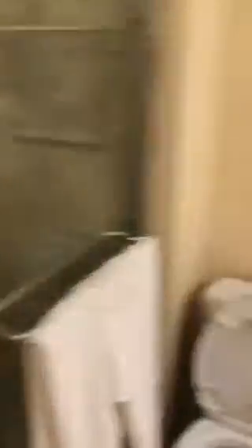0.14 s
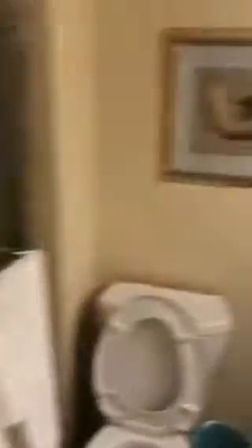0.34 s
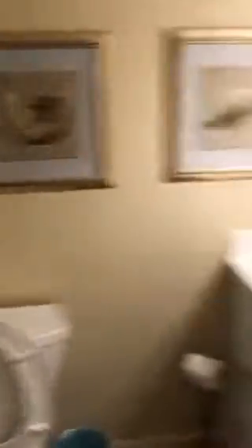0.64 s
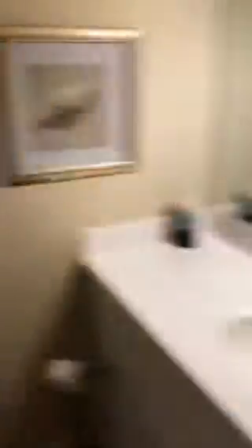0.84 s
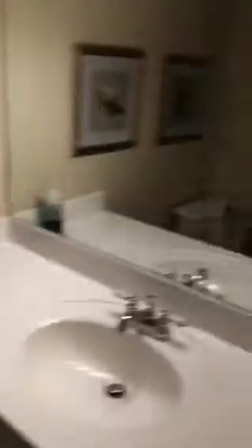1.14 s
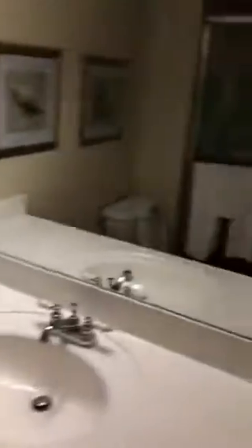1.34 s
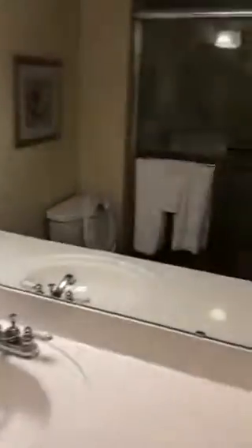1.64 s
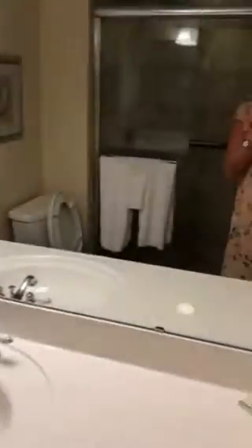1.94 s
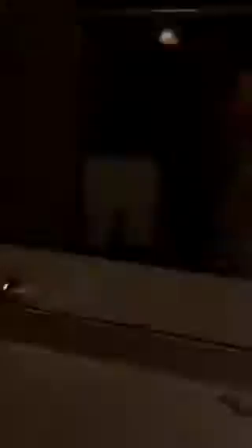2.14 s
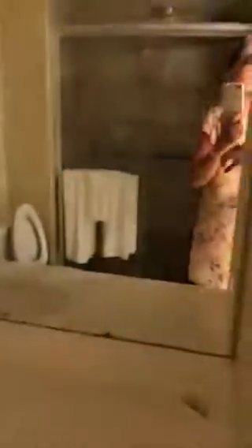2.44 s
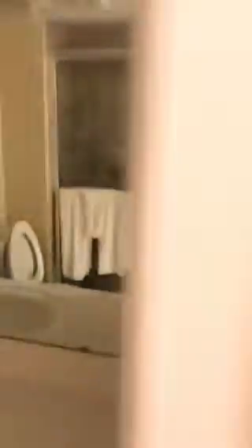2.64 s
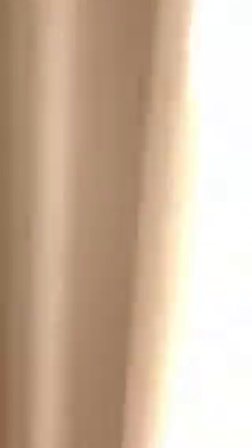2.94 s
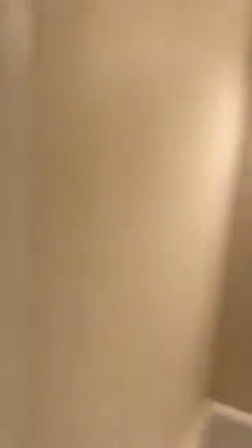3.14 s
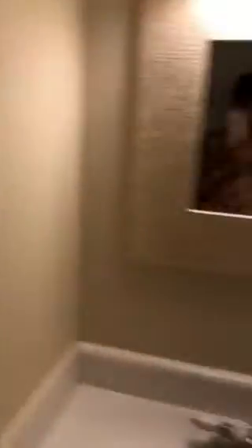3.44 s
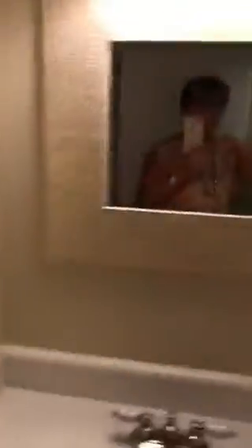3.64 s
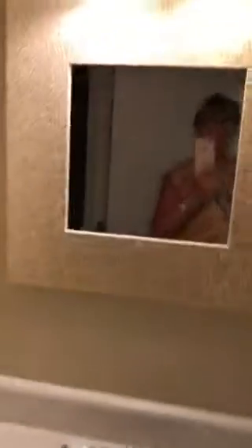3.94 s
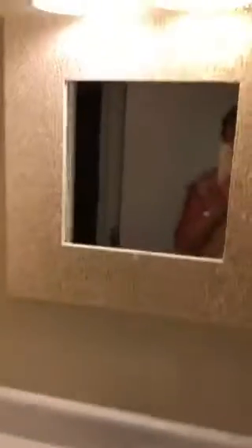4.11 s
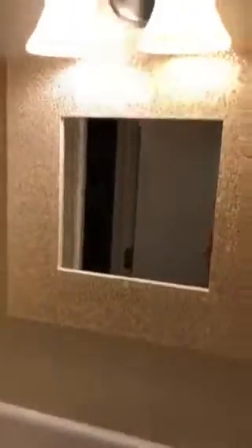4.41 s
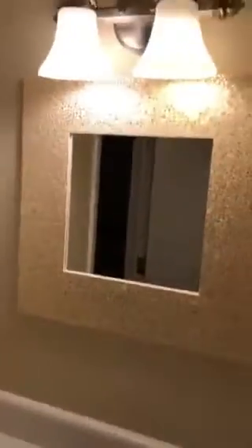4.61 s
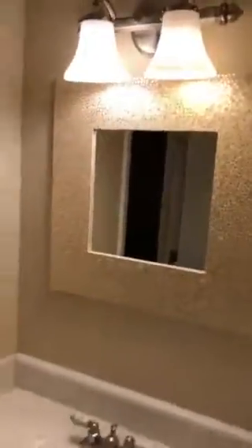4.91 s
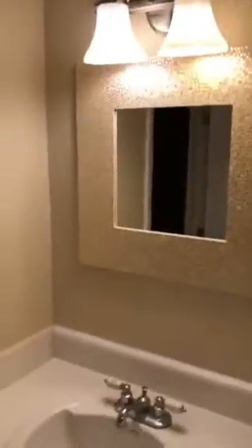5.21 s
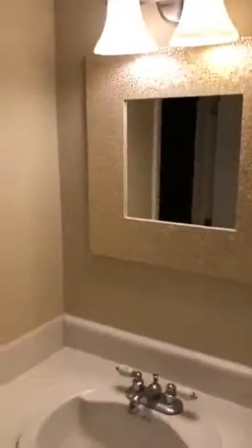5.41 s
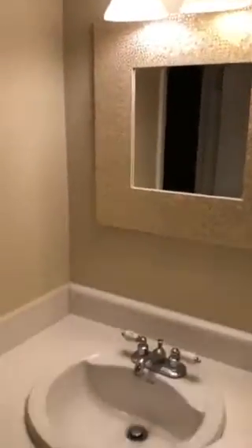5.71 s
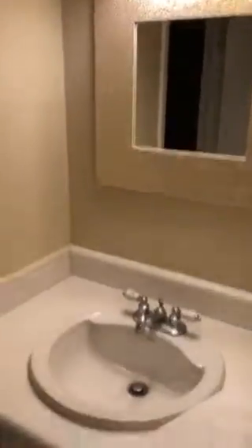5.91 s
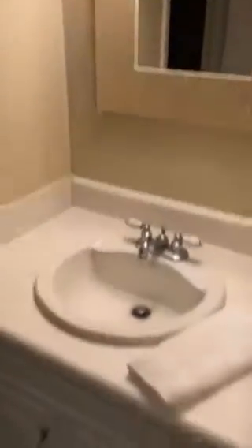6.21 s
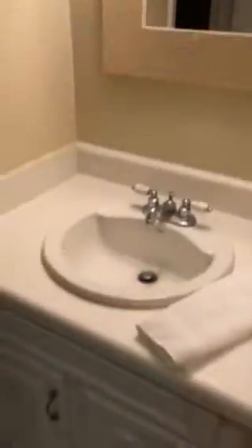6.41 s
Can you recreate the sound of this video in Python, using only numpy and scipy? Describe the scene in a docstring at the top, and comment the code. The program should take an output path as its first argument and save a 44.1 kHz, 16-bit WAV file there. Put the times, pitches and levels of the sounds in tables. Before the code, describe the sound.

A bathroom extractor fan rushes until a switch snaps it off, followed by short door hinge squeaks, shuffling steps and light knocks.

```python
"""A small, hard-walled bathroom, on one microphone a few steps from everything, over a low house rumble.
An extractor fan rushes through its duct, the blade tone swelling and fading with a walk through the
room's standing waves, until a wall switch snaps it off and it coasts down. A door hinge sticks and slips
in short squeaks. Someone shuffles to the next washbasin, soles and clothes rubbing, with soft steps,
light knocks and one bright clack."""
import sys
import numpy as np
from scipy import signal
from scipy.fft import rfft, irfft, next_fast_len
from scipy.io import wavfile

SR = 44100
rng = np.random.default_rng(int(sys.argv[2]) if len(sys.argv) > 2 else 0)


def generate_wav(sig):
    """Save sig (samples, or channels by samples) to the path in sys.argv[1] as 16-bit PCM at SR."""
    pcm = np.round(np.clip(np.atleast_2d(sig).T, -1, 1) * 32767).astype(np.int16)
    wavfile.write(sys.argv[1], SR, pcm)


N = 289138
TIME = np.arange(N) / SR
SWITCH_S = 2.233


def from_db(db):
    """Decibels to gain."""
    return 10 ** (np.asarray(db) / 20)


def rms_one(x):
    """Scale to unit power."""
    return x / np.sqrt(np.mean(x ** 2) + 1e-20)


def in_time(rows):
    """Each column of a curve, sample by sample."""
    times, *columns = np.transpose(rows)
    return [np.interp(TIME, times, column) for column in columns]


def at_hz(points, hz):
    """Read a table on a log-frequency axis."""
    frequencies, values = np.transpose(points)
    return np.interp(np.log(hz + 1e-9), np.log(frequencies), values)


def noise(spectrum, size=N, ripple_db=2.0, ripple_hz=24):
    """Noise of the given colour, rippled by the standing waves of a hard room; rms 1."""
    padded = next_fast_len(size)
    hz = np.fft.rfftfreq(padded, 1 / SR)
    ripple = ripple_db * np.interp(hz / ripple_hz, np.arange(SR), rng.standard_normal(SR))
    ripple *= np.minimum(hz / 900, 1)
    low_cut = np.minimum(hz / spectrum[0][0], 1) ** 4
    gain = from_db(at_hz(spectrum, hz) + ripple) * low_cut
    return rms_one(irfft(rfft(rng.standard_normal(padded)) * gain, padded)[:size])


def drift(rate_hz, size=N):
    """A random wander with a spread of about 1."""
    knots = rng.standard_normal(size // 16)
    return np.interp(np.arange(size) * rate_hz / SR, np.arange(len(knots)), knots)


def arch(start, length):
    """Half a sine: rises from 0 to 1 and falls back over the given span."""
    return np.abs(np.sin(np.pi * np.clip((TIME - start) / length, 0, 1)))


def cut(x, hz, kind):
    """Second-order low- or high-pass."""
    return signal.sosfilt(signal.butter(2, min(hz, SR / 2 - 1000), kind, fs=SR, output="sos"), x)


def resonance(x, hz, width):
    """One resonance with gain 1 at its peak."""
    radius = np.exp(-np.pi * width / SR)
    poles = [1, -2 * radius * np.cos(2 * np.pi * hz / SR), radius ** 2]
    return signal.lfilter(np.array([1, 0, -1]) * (1 - radius ** 2) / 2, poles, x)


def add(track, start, sound):
    """Mix a sound in at a time in seconds."""
    at = round(start * SR)
    track[at:at + len(sound)] += sound[:N - at]


def wall_echoes(spectrum):
    """Dense echoes of one impulse: a second of noise that dies away octave by octave."""
    # the bathroom's reverberation: (frequency [Hz], t60 [s])
    decay_times = [(150, .5), (500, 0.41), (1500, 0.39), (3000, 0.5), (5000, 0.39), (8000, 0.37),
                   (15000, 0.32)]
    whole, hz = rfft(noise(spectrum, size=SR)), np.arange(SR // 2 + 1)
    centres = 125 * 2. ** np.arange(8)
    out = 0
    for centre, share in zip(centres, np.eye(len(centres))):
        band = irfft(whole * at_hz(np.c_[centres, share], hz))
        out += band * from_db(-60 * TIME[:SR] / at_hz(decay_times, centre))
    return out


def room(x):
    """The echoes of a sound, about as strong as the sound itself."""
    echoes = wall_echoes([(100, 0), (16000, -1)])
    return signal.fftconvolve(x, echoes / np.linalg.norm(echoes))[:N]


def impact(blow, crack_db=-4, crack_s=0.0071):
    """Give a blow a brief opening crack; its first 20 ms have rms 1."""
    cracked = blow * (1 + from_db(crack_db) * np.exp(-TIME[:SR] / crack_s))
    return cracked / np.std(cracked[:SR // 50])


def fan_air(speed, eddy_db=3, flutter_db=0.9):
    """Turbulence rushes and hisses in the duct; eddies excite each resonance unevenly."""
    # airflow at full speed: (time [s], rush level [dB], hiss level [dB])
    airflow = [(0, -39, -63.5), (.5, -40, -62), (.9, -39, -61.5), (1.2, -40, -62.5), (1.7, -40, -61.5),
               (2.2, -40, -62)]
    # colours of the rush and the hiss: (frequency [Hz], relative level [dB])
    rush_spectrum = [(45, -17), (70, -14), (100, -13.5), (130, -3.5), (170, -9), (250, -4.5), (335, -5.5),
                     (480, -3), (800, -8.5), (1250, -10), (1900, -16), (2500, -15.5), (4200, -24.5),
                     (7000, -40.5), (12000, -80)]
    hiss_spectrum = [(3500, -17.5), (5000, 0), (7000, -2), (8500, -5.5), (10000, -5), (11500, -11),
                     (16000, -13)]
    # resonances of housing and duct: (frequency [Hz], width [Hz], level over the rush [dB])
    duct_modes = [(135.5, 9.8, 2), (252, 20, -3.5), (460, 24, -4), (510, 28, -4.5), (600, 9.8, -1.5),
                  (655, 14, -5), (718.5, 16, -4), (920, 20, -6), (1032, 71.7, -2.5), (1253, 37, -5),
                  (1390, 78, -7.5), (1710, 14, -9), (2208, 92, -2.5), (2450, 50, -10), (3100, 91, -5),
                  (3420, 49, -3)]
    rush_db, hiss_db = in_time(airflow)
    turbulence = noise(rush_spectrum, ripple_db=3.0)
    duct = sum(from_db(db + eddy_db * drift(18)) * resonance(turbulence, hz, width)
               for hz, width, db in duct_modes)
    rush = rms_one(turbulence + duct) * from_db(rush_db + flutter_db * drift(25))
    hiss = noise(hiss_spectrum) * from_db(hiss_db)
    return rush * speed ** 2.15 + hiss * speed ** 2.1


def fan_blades(speed, angle, blades=10, flutter_db=1.5, duct_cutoff_hz=225):
    """The blade tone stands in the room; as it falls it beats against its own, higher echoes."""
    # full-speed tone along the walk through the standing waves: (time [s], level [dB])
    walk_levels = [(.2, -46), (.5, -41.5), (.75, -41), (1.05, -46.5), (1.3, -51), (1.6, -54.5)]
    tone = from_db(flutter_db * drift(22)) * np.sin(blades * angle) * speed ** 1.3
    standing_share = speed ** 14
    standing = from_db(in_time(walk_levels)[0]) * standing_share * tone
    # the duct no longer carries the tone below its cutoff
    carried = cut(cut(tone, duct_cutoff_hz, "high"), duct_cutoff_hz, "high")
    coasting = from_db(-43) * (1 - standing_share) * carried
    return standing + coasting / 2 + room(coasting)


def fan(shaft_hz=42.43, coast_s=0.73, wobble=0.0023, coast_wobble=0.033, hum_hz=118.3):
    """An impeller drives air and tones on its shaft rate; all sink with the speed once the power is off."""
    # impeller tones at full speed: (multiple of the shaft rate, level [dB])
    shaft_tones = [(1, -69), (2, -62), (6, -59), (17, -60)]
    since_off = np.maximum(TIME - SWITCH_S, 0)
    speed = np.exp(-since_off / coast_s)
    air = fan_air(speed)
    unsteady = wobble * drift(12) + coast_wobble * (1 - speed) * drift(90)
    angle = 2 * np.pi * np.cumsum(shaft_hz * speed * (1 + unsteady)) / SR
    shaft = sum(from_db(db + 2 * drift(8.3)) * np.sin(k * angle) for k, db in shaft_tones) * speed ** 4
    # the magnetic hum stops with the current and only the room holds it a moment
    hum = from_db(-60) * np.sin(2 * np.pi * hum_hz * TIME) * np.exp(-since_off / .07)
    return air + np.sqrt(2) * (shaft + fan_blades(speed, angle) + hum)


def house(level_db=-62, whistle_hz=835):
    """Room tone: a low, steady rumble with a faint whistle."""
    # house rumble: (frequency [Hz], relative level [dB])
    rumble_spectrum = [(36, -19.5), (55, 0.5), (70, 1), (90, -9), (115, 0), (145, -10.5), (180, -5),
                       (340, -12), (560, -20), (800, -24), (1300, -27.5), (2800, -34), (5000, -36),
                       (16000, -48)]
    rumble = noise(rumble_spectrum, ripple_db=3.5)
    whistle = from_db(2) * resonance(rumble, whistle_hz, width=25)
    return from_db(level_db) * (rumble + whistle)


def ticks():
    """Thin, hard ticks and a bright clack: a brief crack, then the room."""
    # small hard contacts: (time [s], level [dB], thin below [Hz])
    contacts = [(.876, -54, 5000), (3.053, -69, 2500), (3.208, -67.5, 3500), (3.48, -70, 2000),
                (3.962, -67, 3010), (4.329, -67, 2500), (4.881, -43.5, 600), (4.888, -45.5, 2500),
                (5.714, -74, 12000)]
    # their colour: (frequency [Hz], relative level [dB])
    tick_spectrum = [(290, -43), (500, -21), (678, -22), (761, 2), (988, -11), (1250, -6), (4030, -6.5),
                     (6700, -2), (8090, -4.5), (15100, -7.5), (16000, -15)]
    out = np.zeros(N)
    for start, db, thin_hz in contacts:
        blow = cut(wall_echoes(tick_spectrum), thin_hz, "high")
        add(out, start, from_db(db) * impact(blow))
    return out


def switch(scatter_db=1.5, echo_db=-21.5, build_s=0.0012):
    """The rocker snaps over in a few contacts that ring its plate; the near walls answer at once."""
    # contacts inside the switch: (time [s], level [dB], thin below [Hz])
    contacts = [(2.2332, -19.5, 7100), (2.2328, -10.5, 6020), (2.2329, -9, 6800), (2.2339, -9.5, 1800),
                (2.2355, -12.5, 1300), (2.2344, -25.5, 498.4)]
    # modes of rocker and cover plate: (frequency [Hz], relative level [dB], t60 [s])
    plate_modes = [(1060, -12, 0.017), (1640, -12.5, 0.03), (2862, -2.5, .007), (3820, -3, .006),
                   (5372, -0.5, 0.0047), (7240, 1, 0.0051), (8850, 0, 0.0036), (10500, -3.5, 0.0021),
                   (13400, -3.5, 0.0033)]
    # the snap as the walls return it: (frequency [Hz], relative level [dB])
    echo_spectrum = [(59, -34), (100, -13.5), (350, -10), (442, 0.5), (634, -10), (721, -2), (818, -12),
                     (1060, -5.5), (1390, -10.5), (2800, -7.5), (4470, -9.5), (4870, -5.5), (5530, -13.5),
                     (7450, -11), (16000, -24.5)]
    out, t = np.zeros(N), TIME[:SR // 10]
    for start, db, thin_hz in contacts:
        ring = 0
        for k, (hz, mode_db, t60) in enumerate(plate_modes):
            envelope = from_db(db + mode_db + rng.normal(0, scatter_db) - 60 * t / t60)
            ring += (-1) ** k * envelope * np.sin(2 * np.pi * hz * t)
        add(out, start, cut(ring, thin_hz, "high"))
    build_up = 1 - np.exp(-TIME[:SR] / build_s)
    add(out, SWITCH_S, from_db(echo_db) * wall_echoes(echo_spectrum) * build_up)
    return out


def hinge(sag_per_s=0.46, jitter=0.014, twin_ratio=1.062, chatter_db=3.5, rasp_db=-23, wet_db=-1):
    """Raspy stick-slip squeaks and groans with sagging, unsteady pitch, prolonged by the room."""
    # slips of the hinge: (time [s], length [s], pitch [Hz], level [dB], first overtone, relative [dB])
    slips = [(2.607, 0.034, 2665, -41.5, -10), (2.655, 0.028, 2654, -47.5, -14),
             (2.761, .013, 2670, -43.5, -30), (2.829, 0.034, 2516, -49, -4),
             (2.848, 0.011, 2585, -41.5, -16), (2.875, 0.043, 842, -55.5, -6),
             (2.892, 0.032, 2515, -47, -10), (3.065, 0.023, 858, -57, -20), (3.135, 0.04, 789, -59.5, -25),
             (3.15, .035, 2680, -62, -27)]
    out, t = np.zeros(N), TIME[:SR // 10]
    for start, length, hz, db, overtone_db in slips:
        pitch = hz * (1 - sag_per_s * t + jitter * drift(490, size=len(t)))
        phase = 2 * np.pi * np.cumsum(pitch) / SR
        twin = from_db(-7) * np.sin(twin_ratio * phase)  # a second mode of the pin, just above
        overtones = sum(from_db(overtone_db - 13 * k) * np.sin((k + 2) * phase) for k in range(4))
        rasp = from_db(rasp_db) * rng.standard_normal(len(t))
        grip = from_db(db + chatter_db * drift(318, size=len(t))) * np.sqrt(arch(0, length)[:len(t)])
        add(out, start, grip * (np.sin(phase) + twin + overtones + rasp))
    return out + from_db(wet_db) * room(out)


def shuffle(wet_share=0.7, t60_s=0.37, walk_end_s=5.55, fade_s=0.15, grain_db=1.0):
    """Grainy friction of soles and cloth: each stroke swells, eases and dies away in the room."""
    # sliding strokes: (time [s], length [s], level [dB], brightness [dB])
    strokes = [(3.026, 0.13, -55.5, -1.5), (3.2, 0.052, -59, 3), (3.582, 0.13, -57.5, 0),
               (3.676, 0.11, -53.5, 1), (4.005, 0.12, -53.5, 3.5), (4.082, 0.11, -55.5, -3.5),
               (4.6, .06, -57.5, 0), (4.724, 0.16, -60, 8), (5.211, 0.079, -51, 3)]
    # middle and treble of the friction: (frequency [Hz], relative level [dB])
    body_spectrum = [(200, -14), (500, -9), (900, -5.5), (1700, -1), (3000, -3.5), (5000, -5), (9000, -26)]
    top_spectrum = [(1500, -16.5), (3500, -6), (6000, -1), (9000, -3.5), (12000, -6), (16000, -7.5)]
    # clothes rustle faintly for as long as the walk lasts
    rustle = from_db(-74.5) * np.clip((walk_end_s - TIME) / fade_s, 0, 1)
    retained = from_db(-60 / (t60_s * SR)) ** 2  # power the room keeps from sample to sample
    out = 0
    for spectrum, layer_db, tilt in ((body_spectrum, -2, -.5), (top_spectrum, -4, .5)):
        direct = sum((from_db(db + tilt * bright_db) * arch(start, length)) ** 2
                     for start, length, db, bright_db in strokes)
        lingering = signal.lfilter([1 - retained], [1, -retained], direct)
        power = (1 - wet_share) * direct + wet_share * lingering + rustle ** 2
        out += from_db(layer_db) * noise(spectrum) * np.sqrt(power)
    return out * from_db(grain_db * drift(180))


def knocks(ring_q=4.7):
    """Soft steps and dull knocks, each with one broad resonance, dying away in the room."""
    # steps and knocks: (time [s], level [dB], ring [Hz], ring gain [dB], dull above [Hz])
    blows = [(3.089, -60, 129, 22, 400), (3.687, -54, 980, 4, 2500), (3.785, -49.5, 920, 6, 1220),
             (4.585, -52.5, 823, -3, 6000), (4.627, -57.5, 1770, 17, 2200), (4.842, -52.5, 1660, 1, 1700),
             (4.881, -51, 1480, 8, 2500), (5.190, -54.5, 365, 12, 6000), (5.304, -53.5, 3940, 5, 5500),
             (5.310, -48.5, 850, 8, 2200), (5.530, -61, 3600, -5, 3570), (6.09, -64, 350, 0, 499)]
    # their colour: (frequency [Hz], relative level [dB])
    knock_spectrum = [(60, 2), (200, 0.5), (400, 4), (900, -1), (1500, 2), (3000, -5), (6000, -10),
                      (16000, -4)]
    out = np.zeros(N)
    for start, db, hz, ring_db, dull_hz in blows:
        blow = wall_echoes(knock_spectrum)
        ring = from_db(ring_db) * resonance(blow, hz, hz / ring_q)
        add(out, start, from_db(db) * impact(cut(blow + ring, dull_hz, "low")))
    return out


def tap(start_s=4.7793, level_db=-47, sweep_hz=6000, end_hz=170, fall_s=0.001154, decay_s=0.012):
    """A light tap whose bending wave arrives treble first: a falling chirp that ends in a small thud."""
    out, t = np.zeros(N), TIME[:SR // 10]
    pitch = end_hz + sweep_hz * np.exp(-t / fall_s)
    chirp = np.sin(2 * np.pi * np.cumsum(pitch) / SR)
    add(out, start_s, from_db(level_db) * chirp * np.exp(-(t / decay_s) ** 2))
    return out + from_db(-13) * room(out)


def scene():
    """All sources at one microphone."""
    return (fan() + house() + ticks() + switch() + hinge() + shuffle() + knocks() + tap())[None]


def record(dry):
    """The loudest peak is rounded off and the top is cut steeply."""
    ceiling, cutoff_hz = .65, 15900
    rounded = ceiling * np.tanh(dry / ceiling)
    return signal.sosfilt(signal.ellip(10, .2, 70, cutoff_hz, fs=SR, output="sos"), rounded)


dry = scene()
out = record(dry)
generate_wav(out)
```